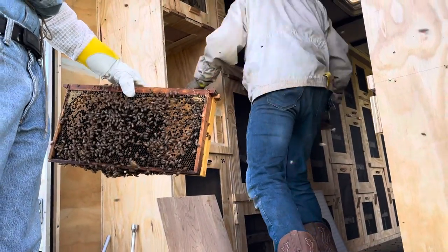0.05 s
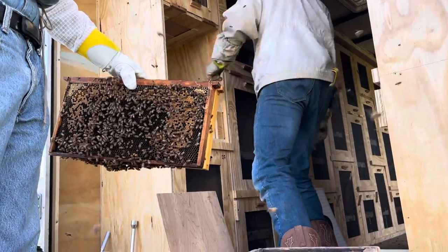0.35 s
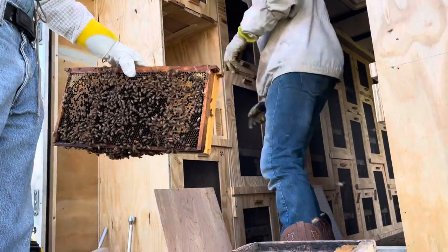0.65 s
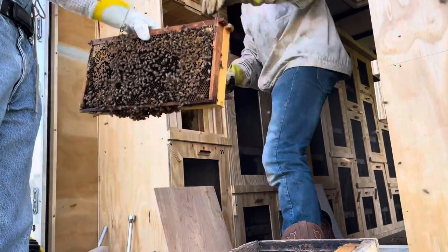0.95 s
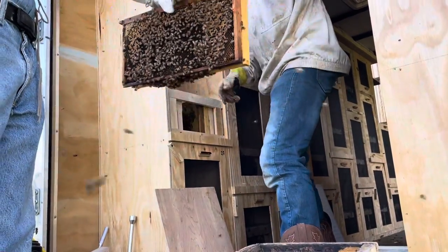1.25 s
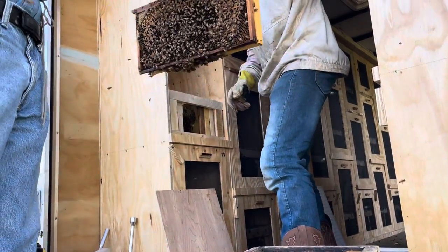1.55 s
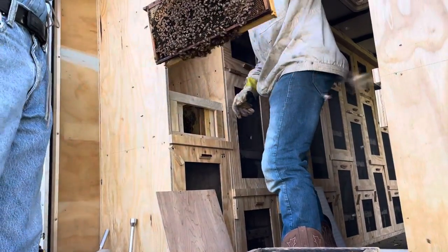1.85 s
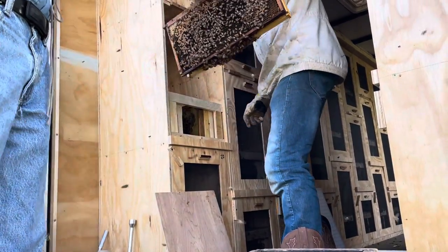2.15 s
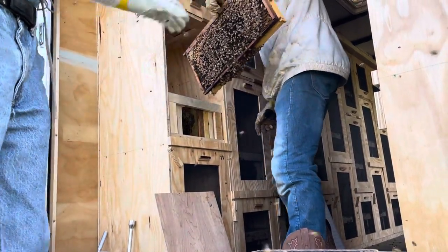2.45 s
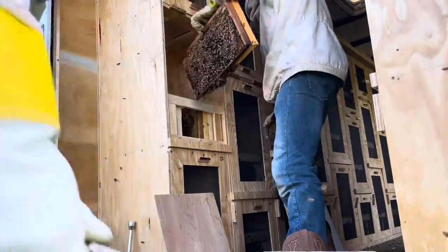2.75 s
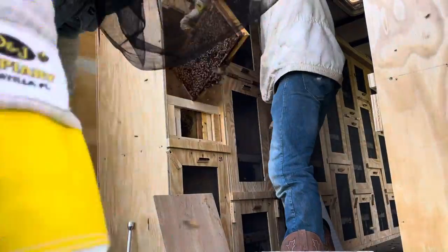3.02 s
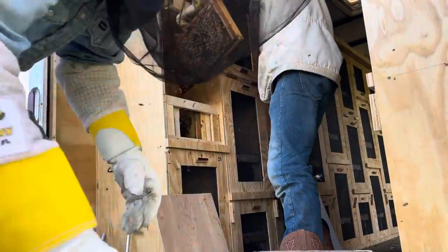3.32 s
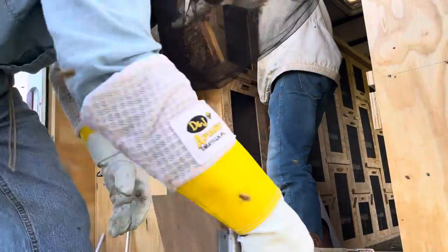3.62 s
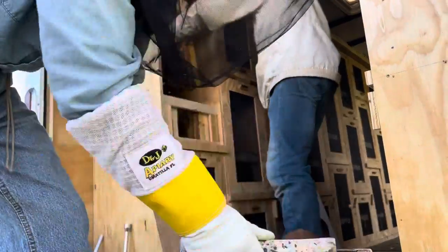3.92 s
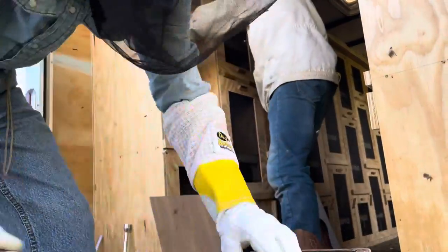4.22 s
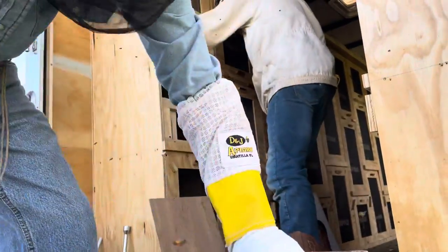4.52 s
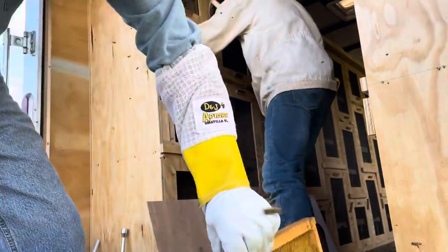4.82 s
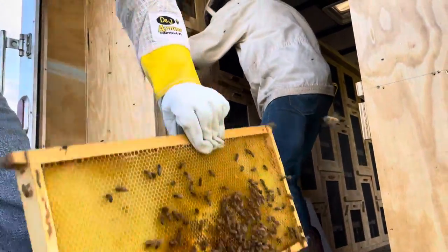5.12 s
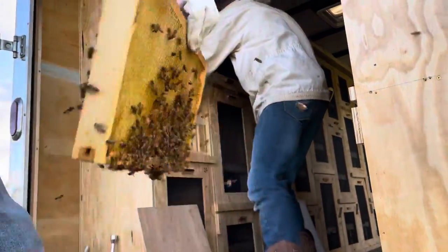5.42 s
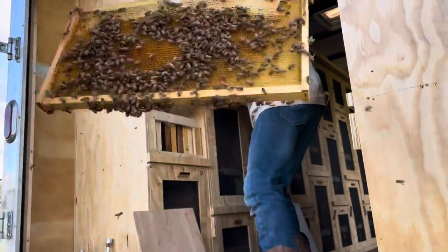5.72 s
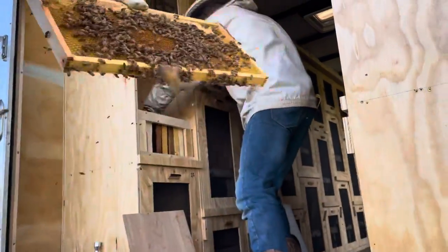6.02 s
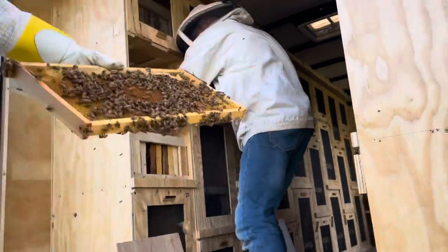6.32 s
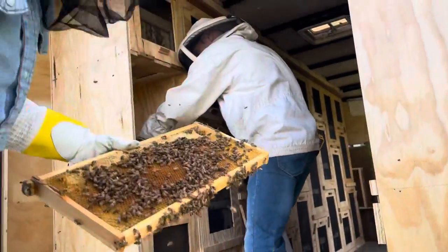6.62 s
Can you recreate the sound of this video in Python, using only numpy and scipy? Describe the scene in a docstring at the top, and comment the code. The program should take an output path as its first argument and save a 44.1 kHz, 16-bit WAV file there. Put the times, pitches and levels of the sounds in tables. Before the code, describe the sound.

Inside a small wooden trailer, a swarm of bees hums throughout over a faint low drone and fine hiss. Short splintering snaps of a prying tool come first, followed by a quick cluster of cracks, clicks and knocks as frames bump a hive box. A bee zips by very close. Nearby movements then push rumbling air over the microphone, with a run of soft, low thumps toward the end.

```python
"""Inside a plywood-lined trailer, honeybees swarm around open hives while two keepers work close by.
The buzz is many wingbeats, each at its own pitch; single bees hover or pass, and one shoots by very close.
A hive tool splinters glued joints loose, frame bars click, and frames knock on the boards of a hive box.
Swinging arms and combs push rumbling air over the microphone, among dull handling bumps.
A low throbbing drone, a faint hum and a fine hiss lie underneath."""
import sys
import numpy as np
from scipy import signal
from scipy.fft import rfft, irfft, next_fast_len
from scipy.io import wavfile
from scipy.ndimage import map_coordinates

SR = 44100
rng = np.random.default_rng(int(sys.argv[2]) if len(sys.argv) > 2 else 0)


def unload_audio(sound):
    """Save the sound as a 16-bit wav file, at the path given as the first command line argument."""
    columns = np.transpose(np.atleast_2d(sound))
    # keep every value between -1 and 1, then stretch to whole-number steps
    steps = np.round(np.clip(columns, -1, 1) * 32767)
    wavfile.write(sys.argv[1], SR, steps.astype(np.int16))


N = 294147
BEE_FALLOFF = 2.23  # power of distance by which a single bee fades


def amp(db):
    """Decibels to gain."""
    return 10 ** (np.asarray(db) / 20)


def unit(x):
    """Scale to rms 1."""
    return x / np.sqrt(np.mean(x ** 2) + 1e-20)


def lean_left(db):
    """Stereo gains: left up by db, right down by db."""
    return amp([[db], [-db]])


def along(points, hz):
    """Read (frequency, value) points on a log axis."""
    freqs, values = np.transpose(points)
    return np.interp(np.log(hz + 1e-3), np.log(freqs), values)


def automation(points):
    """Join (time_s, value) points into one value per sample."""
    return np.interp(np.arange(N) / SR, *np.transpose(points))


def drift(rate, block=64):
    """A smooth random curve with rate knots a second, one value per block of samples."""
    knots = rng.standard_normal(int(N * rate / SR) + 4)
    return map_coordinates(knots, [np.arange(0, N + block, block) * rate / SR])


def wobble(rate, block=64):
    """A smooth random curve, one value per sample."""
    return np.interp(np.arange(N), np.arange(0, N + block, block), drift(rate, block))


def nearness(nearest_s, half_length_s):
    """Closest distance over present distance for something passing in a straight line."""
    return 1 / np.hypot(1, (np.arange(N) / SR - nearest_s) / half_length_s)


def filtered(x, response):
    """Shape x with a gain that depends on frequency."""
    size = next_fast_len(x.shape[-1] + SR // 10)
    return irfft(rfft(x, size) * response(np.fft.rfftfreq(size, 1 / SR)), size)[..., :x.shape[-1]]


def lowpass(hz, corner_hz):
    """Gain of a third-order low-pass."""
    return 1 / np.sqrt(1 + (hz / corner_hz) ** 6)


def band(x, low_hz, high_hz):
    """A causal band-pass, which keeps attacks sharp."""
    high_hz = min(high_hz, SR / 2 - 100)
    edges_hz = [min(low_hz, high_hz / 2), high_hz]
    return signal.sosfilt(signal.butter(3, edges_hz, "band", fs=SR, output="sos"), x)


def spread(pair, spectrum):
    """Two unrelated signals become a coloured left and right of rms 1."""
    # how alike left and right are: frequency_hz, likeness
    stereo_likeness = [(60, 0.76), (300, 0.87), (700, 0.66), (2200, 0.94), (4000, 0.45), (5600, 0.66),
                       (7000, 0.0031), (7800, -1.05), (8700, -1.23), (10000, -0.71), (11300, 0.11),
                       (12900, 1)]

    def mid_side_gains(hz):
        angle = np.arccos(np.clip(along(stereo_likeness, hz), -1, 1)) / 2
        return amp(along(spectrum, hz)) * [np.cos(angle), np.sin(angle)]

    mid, side = filtered(pair, mid_side_gains)
    return unit(np.array([mid + side, mid - side]))


def add(track, start_s, sound):
    """Mix a sound in at start_s."""
    part = track[..., round(start_s * SR):][..., :sound.shape[-1]]
    part += sound[..., :part.shape[-1]]


def room(x):
    """The plywood walls answer with a short tail, different in each channel."""
    # the trailer's decay: frequency_hz, t60_s
    wall_decay = [(150, 0.19), (1000, 0.14), (4000, 0.16), (8000, 0.088), (14000, 0.021)]
    hz, t, noise = signal.stft(rng.standard_normal((2, SR // 3)), SR, nperseg=256)
    tail = signal.istft(noise * amp(-60 * t / along(wall_decay, hz)[:, None]), SR, nperseg=256)[1]
    tail = np.pad(tail, ((0, 0), (SR // 250, 0)))  # 4 ms pre-delay
    return signal.fftconvolve(x, tail / np.linalg.norm(tail[0]), axes=1)[:, :x.shape[-1]]


def hiss():
    """A fine, gently wavering bed of open air."""
    # the air's level ride: time_s, level_db
    ride = [(0, -47), (4.5, -48), (5.3, -45.5), (6.67, -46)]
    # the air's colour: frequency_hz, density_db
    colour = [(25, -41), (50, -28), (80, 8.5), (200, 4.5), (330, 0), (780, 1.5), (1400, -3), (2200, -14.5),
              (4500, -17), (6000, -20), (9000, -13), (10700, -13), (13300, -22), (15500, -19.5)]
    return amp(automation(ride) + 0.75 * wobble(7.1)) * spread(rng.standard_normal((2, N)), colour)


def hum():
    """A faint low tone comes and goes above the drone."""
    pitch_hz = 166 + 1.5 * wobble(9)
    swell = nearness(5.5, half_length_s=2.84) ** 4
    return amp(-51.5) * swell * np.sin(2 * np.pi * np.cumsum(pitch_hz) / SR)


def drone():
    """A low wavering tone swells, holds and dies away, throbbing ever more slowly."""
    full_s, rise_s, hold_s, fade_db_per_s = 1.223, 0.31, 0.85, 8
    throb_hz, slowing_s, throb_depth = 5.53, 2.67, 0.5
    t = np.arange(N) / SR - full_s
    level_db = np.interp(t, [-rise_s, 0], [-57.5, -47.5]) - fade_db_per_s * np.maximum(t - hold_s, 0)
    throb_cycles = throb_hz * slowing_s * (1 - np.exp(-t / slowing_s))
    throb = 1 + throb_depth * np.cos(2 * np.pi * throb_cycles)
    pitch_hz = 113.3 + 3 * wobble(14)
    tone = np.sqrt(2) * np.sin(2 * np.pi * np.cumsum(pitch_hz) / SR)
    return amp(level_db + 0.31 * wobble(20.9)) * throb * tone


def rumble():
    """Lumpy low pressure: a light breeze, and a gust for each movement near the microphone."""
    # air pushed by arms and combs: peak_s, level_db, width_s
    gusts = [(2.79, -54, .04), (3.123, -35.5, .11), (3.527, -38, 0.14), (3.74, -35, 0.062),
             (4.593, -40, 0.14), (4.98, -44, 0.04), (5.323, -33.5, 0.2), (5.535, -33, 0.022),
             (6.04, -30.5, 0.1), (6.267, -51, 0.052), (6.634, -36.5, 0.024)]
    # the rumble's colour: frequency_hz, density_db
    colour = [(18, -40), (27, -35), (36, -5), (55, 3), (85, 0), (125, -7.5), (190, -21), (260, -14.5),
              (350, -52), (700, -41), (2000, -91)]
    breeze_db, steepness = -53, 4.76
    gust_power = sum(amp(db) ** 2 * nearness(s, 2 * width_s) ** steepness for s, db, width_s in gusts)
    air = unit(spread(rng.standard_normal((2, N)), colour) * amp(0.38 * wobble(18)))
    return np.sqrt(amp(breeze_db) ** 2 + gust_power) * air


def thud(hz, rise_s, t60_s=0.049):
    """One low, quickly damped swing with a soft attack."""
    t = np.arange(SR // 4) / SR
    envelope = (1 - np.exp(-(t / rise_s) ** 2)) * amp(-60 * t / t60_s)
    return envelope / envelope.max() * np.sin(2 * np.pi * hz * t)


def bumps():
    """Soft handling bumps thud without ringing the boards."""
    # dull bumps: start_s, level_db, pitch_hz
    hits = [(2.745, -24.5, 118), (2.77, -26, 115), (2.798, -31, 115), (2.856, -18, 125), (3.059, -29, 113),
            (3.089, -27, 103), (3.468, -28.5, 110), (3.702, -30, 101), (3.812, -28, 113), (4.949, -29, 70),
            (5.109, -17.5, 78), (5.16, -30, 70), (5.224, -30, 80), (5.267, -23.5, 86), (5.314, -24.5, 96),
            (5.378, -23, 78.4), (5.408, -25, 85), (5.498, -21.5, 91), (5.522, -24, 65), (5.544, -23, 66),
            (5.894, -27.5, 166), (5.91, -26, 92), (5.954, -20, 89), (5.984, -19.5, 82), (5.998, -19, 80),
            (6.029, -23, 84), (6.053, -22, 84.5), (6.078, -25, 79), (6.107, -30, 110), (6.162, -18.5, 83)]
    out = np.zeros(N)
    for start_s, level_db, pitch_hz in hits:
        add(out, start_s, amp(level_db) * thud(pitch_hz, rise_s=0.0093))
    return out


def knocks():
    """Each blow gives one low thud, and the chatter of its contact rings the box's boards."""
    # frames bumped and set down on wood: start_s, relative_thud_db, thud_hz, relative_clack_db
    hits = [(2.743, -27.5, 205, -37), (2.77, -32, 270, -58), (2.841, -17, 164, -39),
            (2.859, -10.5, 127, -30.5), (2.867, -32, 119, -55), (2.882, -14.5, 316, -42),
            (2.901, -20, 298, -54), (2.913, -20.5, 135, -56), (3.017, -18.5, 280, -34),
            (3.027, -25, 318, -30), (3.032, -16, 284, -37), (3.053, -18, 188, -38), (3.2287, -27, 260, -50),
            (3.351, -41, 302, -44), (3.641, -14.5, 296, -34), (3.66, -25.5, 308, -51),
            (3.686, -22, 270, -45), (6.62, -27.5, 216, -54)]
    # the hive box's modes: pitch_hz, level_db, t60_s
    box_modes = [(351, 3, 0.057), (446, 2, 0.049), (567, 1.5, 0.024), (665, 1, 0.015), (864, -4, 0.033),
                 (970, -12, 0.027), (1160, 3, 0.014), (1370, -18, 0.019), (1700, -14, 0.021)]
    chatter_s = 0.0084
    out, t = np.zeros(N), np.arange(SR // 4) / SR
    hz, mode_db, t60_s = np.transpose(box_modes)[:, :, None]
    for start_s, thud_db, thud_hz, clack_db in hits:
        decays = amp(mode_db + 2 * rng.standard_normal(hz.shape) - 60 * t / t60_s)
        modes = decays * np.sin(2 * np.pi * (hz * t + rng.random(hz.shape)))
        ring = modes.sum(0) * (1 - np.exp(-t / 0.00017))
        contact = 0.22 * rng.standard_normal(len(t)) * np.exp(-t / chatter_s)
        contact[0] = 1  # the first impact
        boards = signal.fftconvolve(contact, ring)[:len(t)]
        clack = unit(band(boards, 150, 1010))  # a padded, heavy contact reaches only the low modes
        body = thud(thud_hz, rise_s=0.0043)
        add(out, start_s, amp(thud_db - 4.5) * body + amp(clack_db - 11.5) * clack)
    return out


def clicks():
    """A hard contact rings the frame's bars within a cycle; where it lands decides which modes speak."""
    # bars clicking against wood: start_s, relative_db, centre_hz
    hits = [(0.154, -51, 2490), (0.568, -35.5, 4000), (0.5708, -32.5, 430), (0.802, -37, 2740),
            (0.803, -42, 454), (0.809, -42, 900), (0.921, -47.5, 2980), (2.7405, -36.5, 910),
            (2.7408, -42, 2600), (2.7522, -43.5, 2600), (2.7572, -36.5, 900), (2.8312, -40, 2200),
            (2.8335, -33.5, 1350), (2.84, -46, 3900), (2.852, -33.5, 1700), (2.862, -35.5, 1500),
            (2.877, -31, 950), (3.029, -31.5, 850), (5.0336, -42, 1400), (5.073, -46, 3400),
            (5.078, -37, 1050), (5.085, -42, 950)]
    # the bars' modes: pitch_hz, level_db, t60_s
    frame_modes = [(530, 5, 0.058), (680, -3, 0.051), (872, 3, 0.036), (1064, -1.5, 0.033),
                   (1168, 0.5, 0.026), (1350, -4, 0.018), (1610, -1, 0.043), (1900, -4, 0.03),
                   (2320, -4, 0.021), (2900, -3, 0.025), (3150, -21, 0.014), (3450, -4.5, 0.02),
                   (3980, -5, 0.024), (4810, -6, 0.03), (6250, -12, 0.027)]
    walls_db = -6.5
    out, t = np.zeros((2, N)), np.arange(SR // 4) / SR
    hz, mode_db, t60_s = np.transpose(frame_modes)[:, :, None]
    for start_s, db, centre_hz in hits:
        off_centre_db = 6 * np.log2(hz / centre_hz) ** 2
        gains = amp(mode_db + 2 * rng.standard_normal(hz.shape) - off_centre_db)
        detuned_hz = hz * (1 + .015 * rng.standard_normal(hz.shape))
        modes = gains * amp(-60 * t / t60_s) * np.sin(2 * np.pi * (detuned_hz * t + rng.random(hz.shape)))
        attack = 1 - np.exp(-2 * centre_hz * t)
        ring = 2 * amp(db) * attack * modes.sum(0) / np.linalg.norm(gains) * np.ones((2, 1))
        add(out, start_s, ring + amp(walls_db) * room(ring))
    return out * lean_left(1)


def cracks():
    """Glued wood lets go under the tool in short splintering bursts that wake the walls."""
    # joints splintering: start_s, level_db, low_cut_hz, high_cut_hz, t60_s, walls_db
    snaps = [(0.154, -46, 400, 3000, 0.024, -2), (0.568, -31.5, 1800, 5370, 0.022, -1.5),
             (0.5732, -27, 1190, 19000, 0.02, -2), (0.802, -36.5, 1700, 4630, 0.011, -2),
             (0.806, -38.5, 1700, 6500, 0.029, -2), (2.5293, -41.5, 900, 5000, 0.02, -7),
             (2.7388, -43.5, 1690, 5770, 0.05, -1), (2.8304, -46, 1800, 15000, 0.081, -8),
             (2.8501, -31.5, 2200, 19000, 0.067, -10.5), (3.0522, -32.5, 1800, 3900, 0.0074, -8),
             (3.3473, -39, 900, 14000, 0.012, -12), (5.0332, -39.5, 1200, 4530, 0.02, -15)]
    # the splinters' colour: frequency_hz, density_db
    colour = [(150, -9), (380, 10), (520, 28), (700, -3), (1500, -7.5), (3200, -3), (5000, -6), (8500, 2.5),
              (11000, 6.5), (13000, -14), (15500, -6)]
    out, t = np.zeros((2, N)), np.arange(SR // 4) / SR
    for start_s, level_db, low_hz, high_hz, t60_s, walls_db in snaps:
        grains = rng.standard_normal((2, len(t))) * amp(3.2 * rng.standard_normal(len(t)))
        burst = amp(level_db - 60 * t / t60_s) * unit(band(spread(grains, colour), low_hz, high_hz))
        tail = filtered(room(burst), lambda hz: lowpass(hz, 7050))  # the walls swallow the top end
        add(out, start_s, burst + amp(walls_db) * tail)
    return out * lean_left(1)


def wings(hz, overtones, count=30, size=2048):
    """One wingbeat cycle looped at the pitch hz, rms 1."""
    partials = amp(along(overtones, np.arange(1, count + 1))) * np.exp(2j * np.pi * rng.random(count))
    cycle = unit(irfft(np.r_[0, partials], size))
    return cycle[(np.cumsum(hz) * (size / SR)).astype(int) % size]


def hovering_bees():
    """A bee hanging in the air nearby holds one firm, gently wavering pitch over the swarm."""
    # bees near the hive: nearest_s, wingbeat_hz, level_db, half_length_s
    hovers = [(0.28, 232.2, -48.5, 0.18), (1.354, 225.5, -48.5, 0.081), (1.85, 229.8, -49, 0.062),
              (2.68, 228, -51, 0.083), (3.393, 226, -47, 0.077), (4.04, 228.4, -47, 0.27),
              (4.408, 227.2, -49, 0.14), (4.74, 224.1, -45.5, 0.07), (5.062, 238, -42, 0.037),
              (5.42, 236, -46, 0.073)]
    # a hovering wingbeat: harmonic, level_db
    overtones = [(1, -12.5), (2, 3), (3, -10.5), (4, -16.5), (6, -18.5), (10, -28.5), (30, -67)]
    out = np.zeros(N)
    for nearest_s, hz, db, half_length_s in hovers:
        pitch_hz = hz * (1 + .014 * wobble(14) + .009 * wobble(70))
        swell = amp(db + 0.98 * wobble(25)) * nearness(nearest_s, half_length_s) ** BEE_FALLOFF
        out += swell * wings(pitch_hz, overtones)
    return out


def passing_bees():
    """A passing bee swells as it nears and its pitch bends; each stroke throws a rasping puff of air."""
    # fly-bys: nearest_s, wingbeat_hz, level_db, half_length_s, sag_hz (negative bends up)
    fly_bys = [(0.308, 276.4, -46, 0.035, -2), (0.5, 273.3, -50, 0.08, -0.5), (1.307, 270, -45, 0.049, -4),
               (1.946, 265, -47.5, 0.089, -0.5), (3.838, 233.7, -26.5, 0.038, 14),
               (5.933, 258.8, -48.5, 0.12, 1), (6.442, 264.4, -50, 0.2, 2.5)]
    # a close wingbeat: harmonic, level_db
    overtones = [(1, 4.5), (2, -2.5), (3, -15.5), (4, -32), (6, -26), (10, -39), (20, -60), (30, -38)]
    # air thrown by the wings: frequency_hz, density_db
    rasp_colour = [(250, -12), (700, 4), (1800, -6), (3000, -17), (12000, -27)]
    sag_s, rasp_db = 0.05, -22.5
    out, t = np.zeros(N), np.arange(N) / SR
    for nearest_s, hz, db, half_length_s, sag_hz in fly_bys:
        bent_hz = hz - sag_hz * np.exp(-((t - nearest_s) / sag_s) ** 2)
        tone = wings(bent_hz * (1 + .015 * wobble(130) + .03 * wobble(400)), overtones)
        puffs = np.maximum(tone, 0) ** 2 * rng.standard_normal(N)
        rasp = unit(filtered(puffs, lambda f: amp(along(rasp_colour, f))))
        swell = amp(db + 1.9 * wobble(110)) * nearness(nearest_s, half_length_s) ** BEE_FALLOFF
        out += swell * (tone + amp(rasp_db) * rasp)
    return out


def flock(hz, overtones, scatter, swell_db, count, block=64):
    """Bees with pitches of their own that veer, come nearer and leave."""
    out = np.zeros((2, N))
    for rank in np.linspace(-1, 1, count):
        veer = .028 * drift(6) + .015 * drift(45)
        pitch_hz = hz * np.exp(scatter * np.arctanh(.9 * rank) + veer)
        bee = wings(np.repeat(pitch_hz, block)[:N], overtones)
        bee *= np.repeat(amp(swell_db * drift(6)), block)[:N]
        out[0] += bee
        out[1] += np.roll(bee, rng.integers(-14, 20))  # each bee's angle shifts its arrival on the right
    return unit(out)


def swarm():
    """Most bees cruise; laden ones beat their wings slower, agitated ones faster and harder."""
    # the swarm's level ride: time_s, relative_db
    ride = [(0, -47.5), (2.5, -46), (4.2, -45.5), (5.1, -46.5), (6.2, -49), (6.67, -49.5)]
    # the whine's boost or cut, highest as a comb is lifted out: time_s, gain_db
    whine_ride = [(0, -4), (3.6, 0.5), (4.3, 1), (4.85, 5), (5.3, -5.5), (6.67, 2)]
    # agitated bees against cruising ones: time_s, gain_db
    agitated_ride = [(0, -2.5), (1, -2), (2.6, -3.5), (4, -2.5), (5, -3.5), (6.4, 0)]
    # a calm wingbeat: harmonic, level_db
    calm_wing = [(1, -12.5), (2, 0.5), (3, -13.5), (4, -11.5), (5, -14), (6, -13), (8, -19.5), (12, -27),
                 (20, -28.5), (30, -33.5)]
    # an agitated wingbeat: harmonic, level_db
    hard_wing = [(1, -2), (2, 1.5), (3, -8.5), (4, -11), (5, -9), (6, -15), (8, -16.5), (12, -20),
                 (30, -35.5)]
    whine_hz, half_width_octaves = 940, 0.5
    cruising = flock(233, calm_wing, scatter=.04, swell_db=5, count=24)
    laden = flock(208, calm_wing, scatter=.035, swell_db=3, count=8)
    agitated = flock(265, hard_wing, scatter=.033, swell_db=4.5, count=14)
    bees = cruising + amp(-7.5) * laden + amp(automation(agitated_ride)) * agitated
    bees = unit(bees + amp(-6) * room(bees))
    whine = filtered(bees, lambda hz: np.exp(-(np.log2((hz + 1) / whine_hz) / half_width_octaves) ** 2))
    return amp(automation(ride) + 2) * (bees + (amp(automation(whine_ride)) - 1) * whine)


def scene():
    """Bees and handwork sit slightly left; the handling bumps are too close to wake the walls."""
    wood = knocks() * np.ones((2, 1))
    close = wood + amp(-9.5) * room(wood) + bumps() + cracks() + clicks() + passing_bees() + rumble()
    bees = swarm() + hovering_bees()
    return close * lean_left(.3) + bees * lean_left(1.6) + drone() + hum() + hiss()


def record(dry):
    """Roll off the deepest bass and cut the extreme treble."""
    low_cut_hz, top_hz = 23.4, 15800
    return filtered(dry, lambda hz: (1 - lowpass(hz, low_cut_hz)) * (hz < top_hz))


dry = scene()
out = record(dry)
unload_audio(out)
```